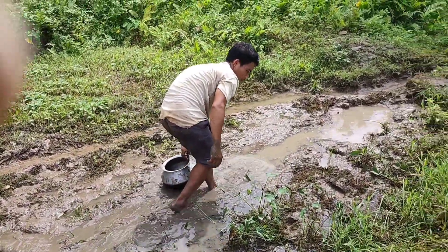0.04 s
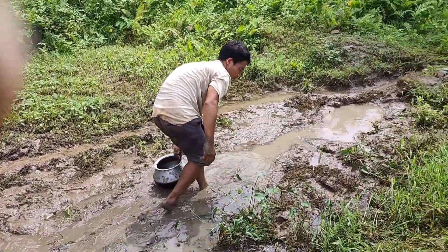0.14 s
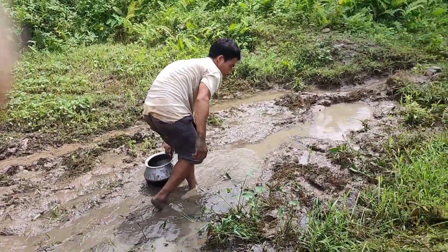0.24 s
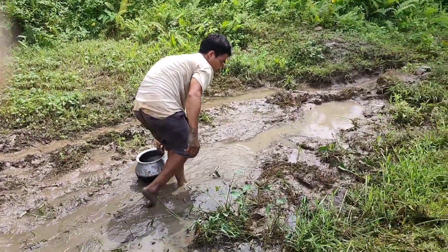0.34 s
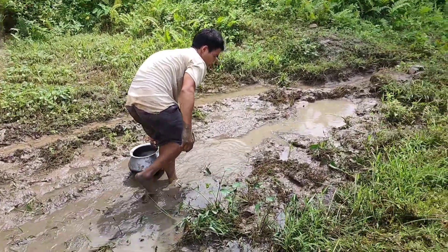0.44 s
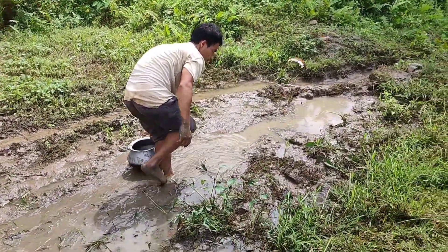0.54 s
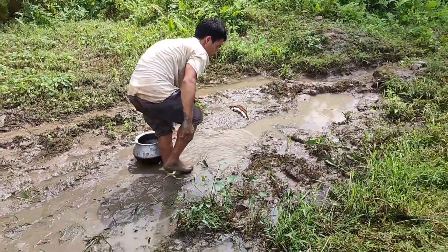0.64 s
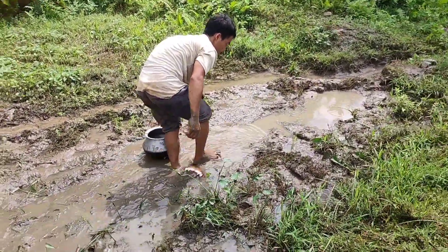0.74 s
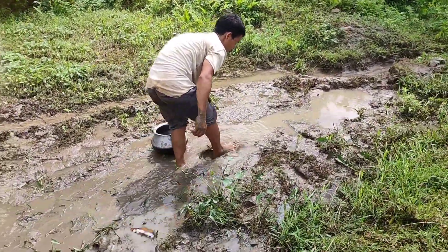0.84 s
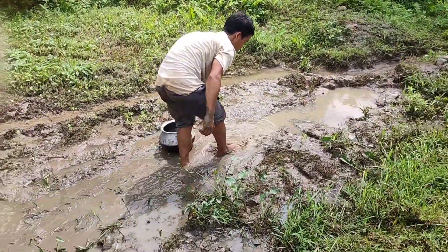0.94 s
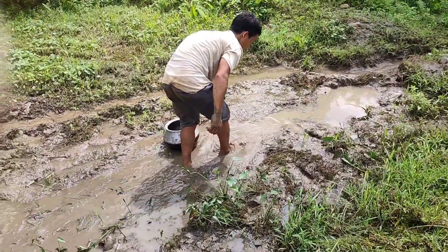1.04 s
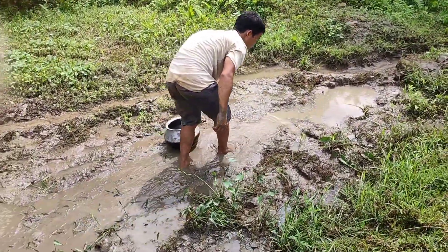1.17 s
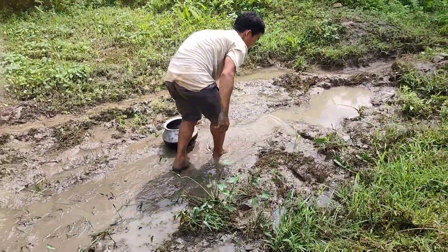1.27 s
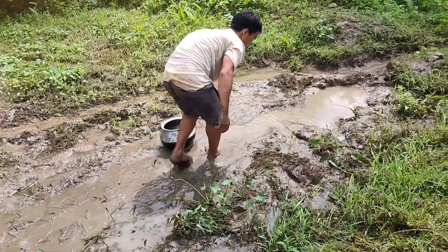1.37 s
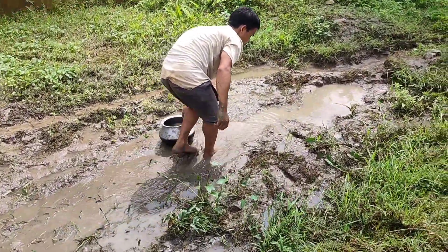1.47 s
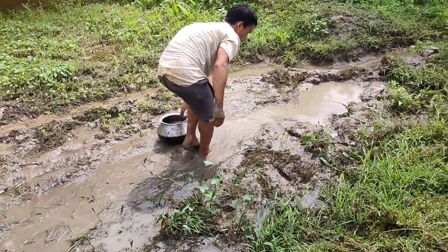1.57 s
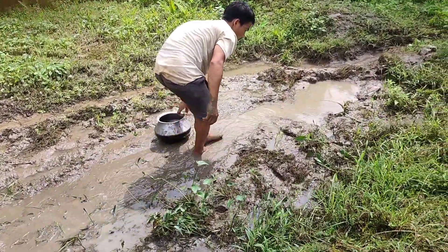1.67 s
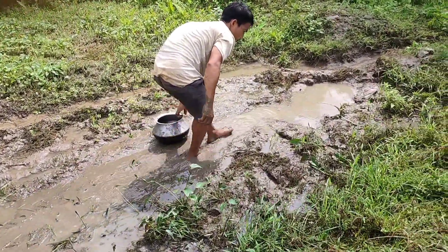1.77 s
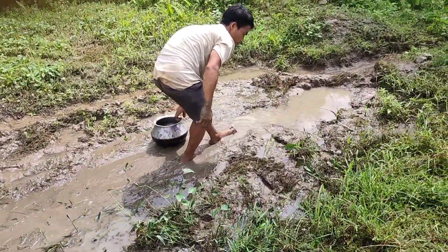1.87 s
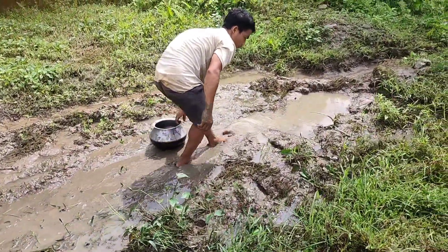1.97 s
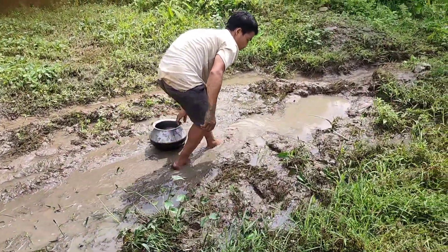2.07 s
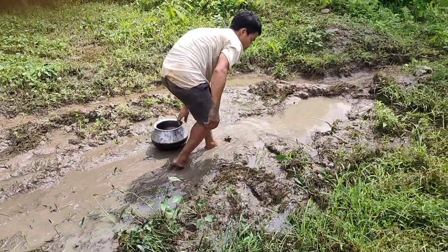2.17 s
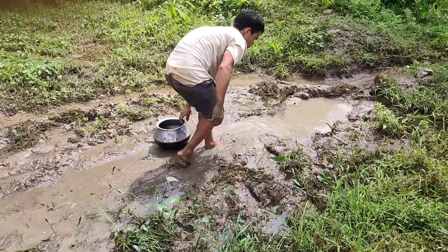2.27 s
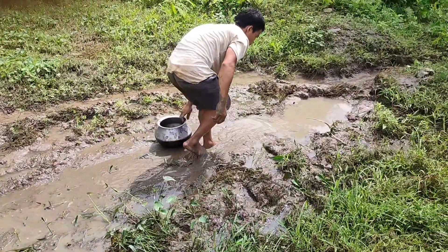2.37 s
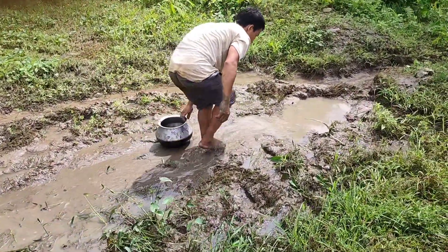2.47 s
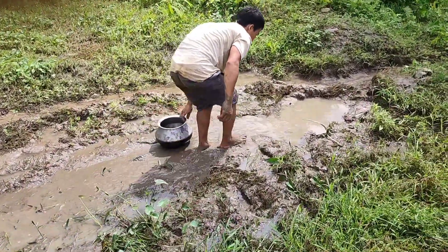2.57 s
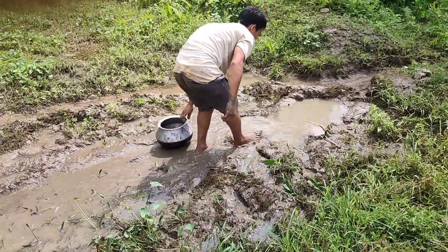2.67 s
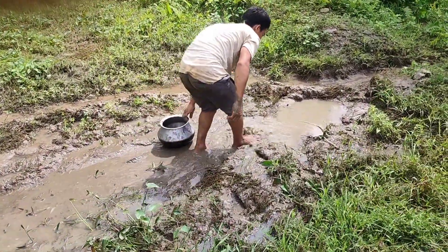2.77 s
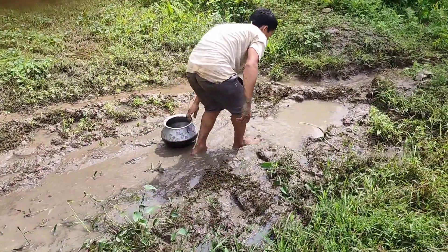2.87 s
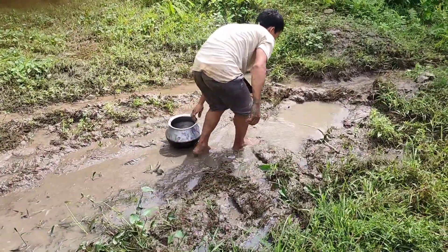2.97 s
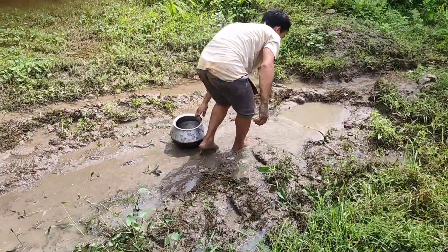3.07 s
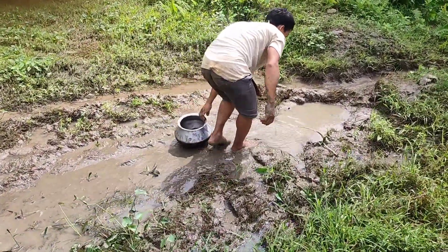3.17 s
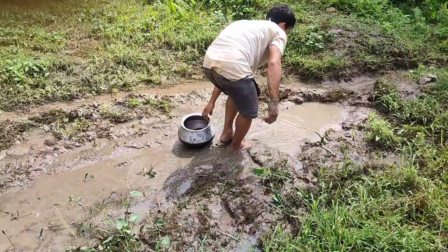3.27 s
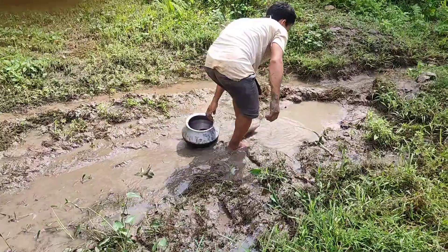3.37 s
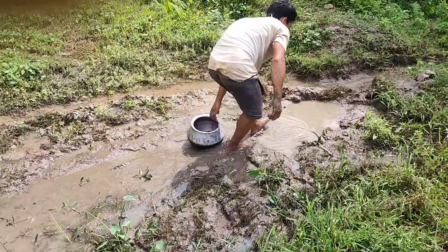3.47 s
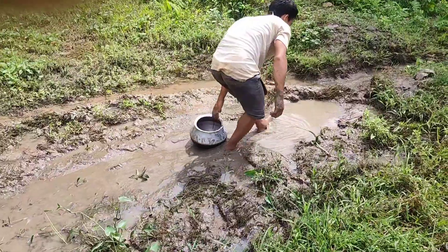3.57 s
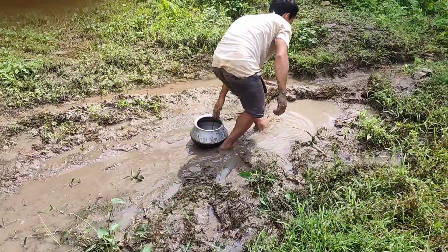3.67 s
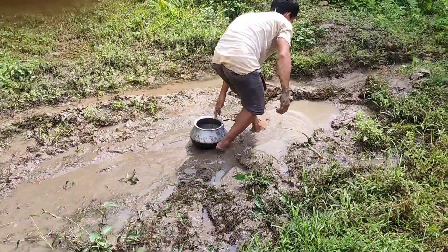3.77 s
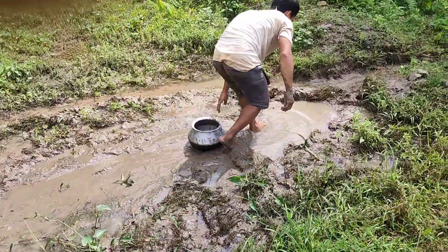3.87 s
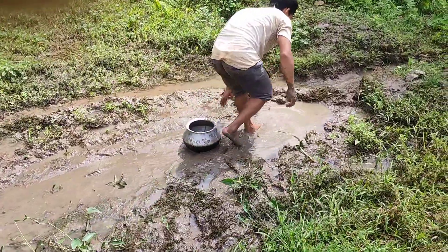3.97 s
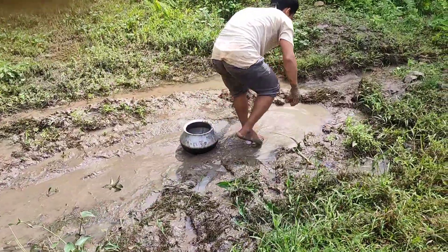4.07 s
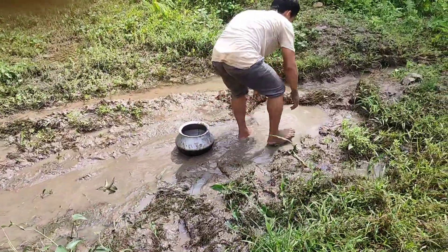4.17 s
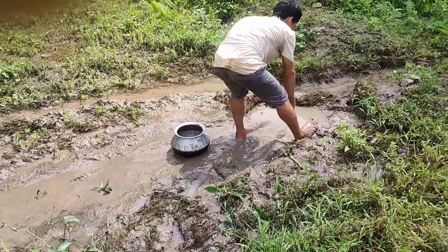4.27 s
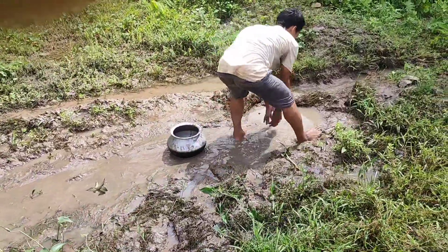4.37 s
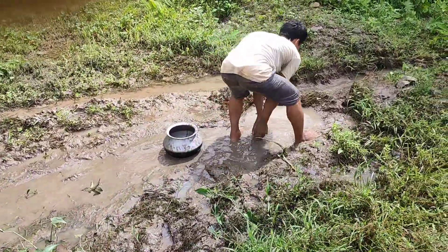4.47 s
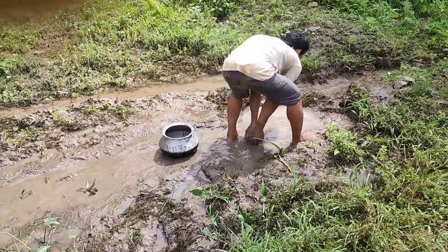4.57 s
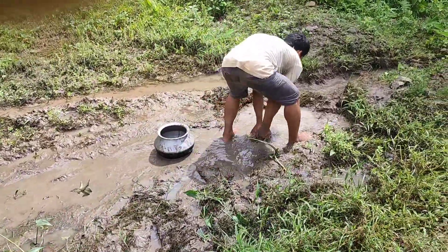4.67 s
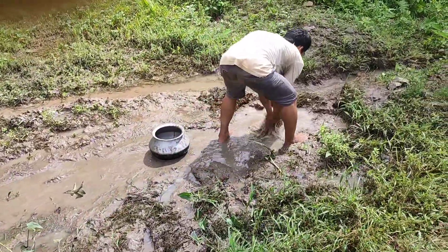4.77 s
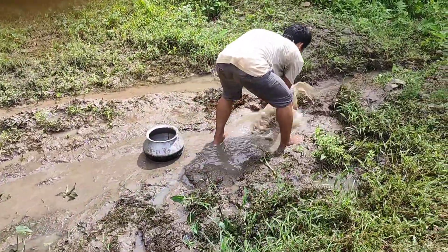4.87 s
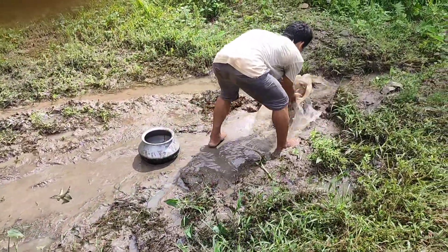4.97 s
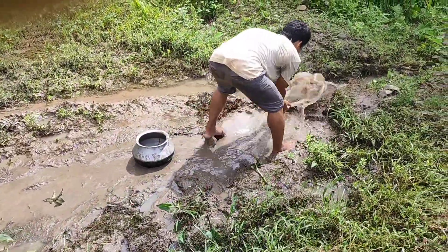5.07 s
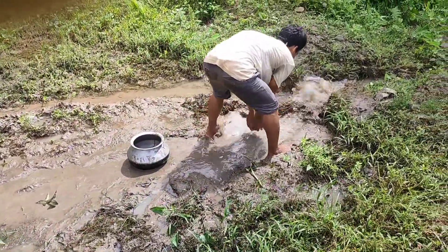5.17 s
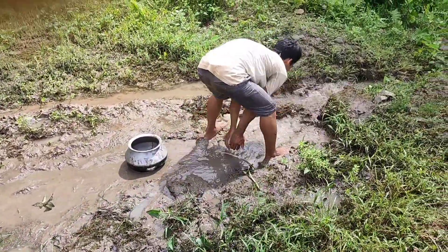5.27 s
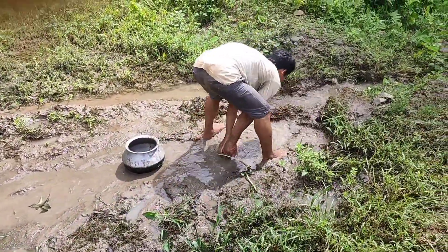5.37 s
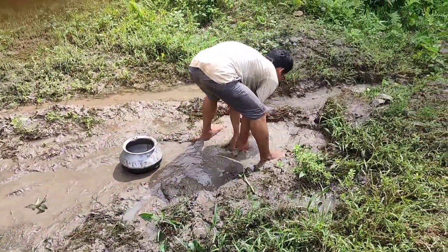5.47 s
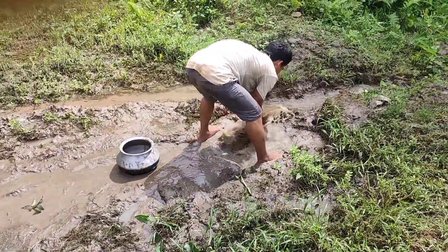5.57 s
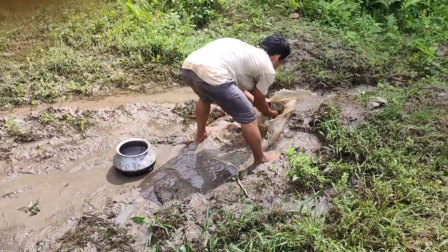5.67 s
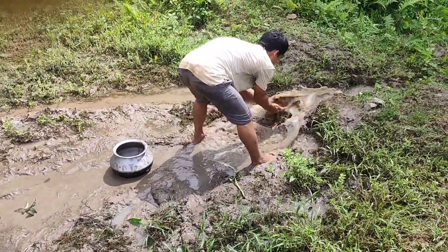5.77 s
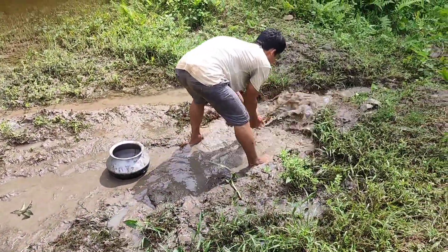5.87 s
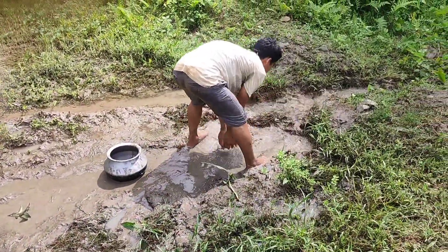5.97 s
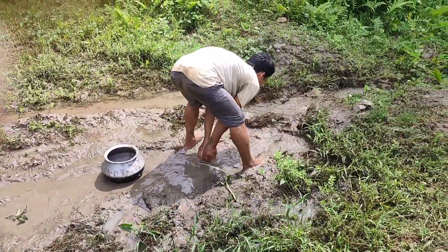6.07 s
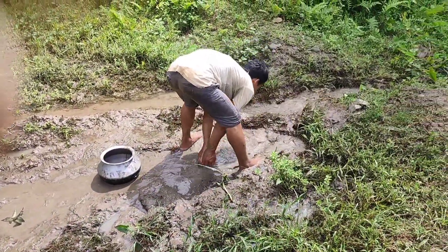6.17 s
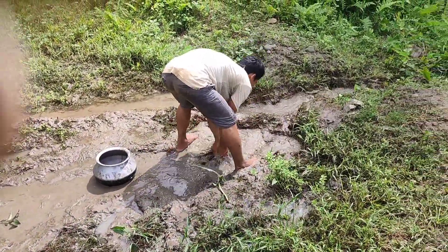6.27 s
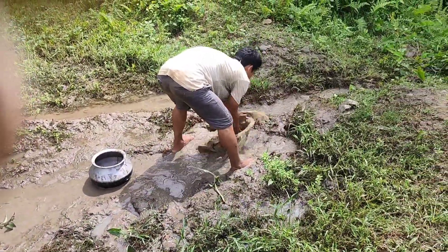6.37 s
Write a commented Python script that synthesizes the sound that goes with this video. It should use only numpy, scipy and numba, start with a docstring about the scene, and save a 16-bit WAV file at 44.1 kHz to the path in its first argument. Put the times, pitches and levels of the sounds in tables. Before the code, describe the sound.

Sparse muddy wading steps and gurgles, a handling bump and rub, then busier scooping with two bright splashes over a quiet open field.

```python
"""Open field, shallow mud puddle: bare feet wade, then cupped hands scoop the water and fling it out twice.
Each step, scoop and throw swells, holds and dies away; trapped air rings as short, gliding sines.
Thrown water lands as spray clicks, pings and mist over big, quickly damped air pockets.
A finger hisses over a hand-held phone near its left port and bumps it once.
The field is soft noise with a regular low throb and a thin high insect band."""
import sys
import numpy as np
from scipy import signal
from scipy.fft import rfft, irfft, next_fast_len
from scipy.io import wavfile
from scipy.ndimage import uniform_filter1d
from numba import njit

SR = 44100
rng = np.random.default_rng(int(sys.argv[2]) if len(sys.argv) > 2 else 0)


def dump(signal):
    """Clip the signal to [-1, 1] and save it as 16-bit WAV at the path in sys.argv[1]."""
    limited = np.clip(np.atleast_2d(signal).T, -1, 1)
    pcm = np.round(limited * 32767).astype(np.int16)
    wavfile.write(sys.argv[1], SR, pcm)


N = 283563
TIME = np.arange(N) / SR


def undb(db):
    """Decibels to gain."""
    return np.exp(np.asarray(db) * (np.log(10) / 20))


def unit(x):
    """Scale to rms 1."""
    return x / np.sqrt(np.mean(x ** 2))


def sides(pan_db):
    """Left and right gains for a level difference."""
    return undb(np.array([[.5], [-.5]]) * pan_db)


def track_gain(t_s, level_db):
    """Gain along a level track, silent outside it."""
    return undb(np.interp(TIME, t_s, level_db, left=-np.inf, right=-np.inf))


def across(points, hz):
    """Read (f/Hz, value) points on a log-frequency axis."""
    f, value = np.transpose(points)
    return np.interp(np.log(hz + 1), np.log(f), value)


def colour(x, points, size=4096):
    """Minimum-phase filter through (f/Hz, gain/dB) points; causal, so attacks stay sharp."""
    hz = np.arange(size // 2 + 1) * SR / size
    cepstrum = irfft(np.log(undb(across(points, hz))))
    cepstrum[1:size // 2] *= 2
    cepstrum[size // 2 + 1:] = 0
    impulse = irfft(np.exp(rfft(cepstrum)))
    return signal.oaconvolve(x, impulse[None], axes=1)[:, :N]


def walk(rate_hz):
    """Smooth random curve, about rate_hz turns a second, spread a little under 1."""
    k = int(SR / rate_hz)
    return uniform_filter1d(np.repeat(rng.standard_normal(N // k + 1), k), k)[:N]


def even(x, span_s):
    """Steady a swarm's power over span_s; single grains stay uneven."""
    k = max(int(span_s * SR), 1)
    power = uniform_filter1d(uniform_filter1d(np.mean(unit(x) ** 2, axis=0), k), k)
    return x / np.sqrt(np.mean(x ** 2) * (power + 0.0078))


# field noise spectrum: f/Hz, gain/dB
FIELD_COLOUR = [(25, -9.5), (100, 0), (260, -4.5), (380, -5), (900, -12.5), (1600, -14.5), (2200, -12.5),
                (3100, -20.5), (5500, -27), (7000, -34), (9000, -24.5), (13000, -35), (15800, -59)]
# likeness of that noise at the two ports: f/Hz, likeness (0-1)
FIELD_LIKENESS = [(30, 0), (120, 0.44), (400, 0.46), (2000, 0), (5000, 0), (15000, 0)]


def field():
    """Open air as part-shared noise, low noise in a regular throb, narrow high noise for insects."""
    mid, side = rng.standard_normal((2, 1, N))
    shared = [(hz, 10 * np.log10(1 + min(c, .98))) for hz, c in FIELD_LIKENESS]
    apart = [(hz, 10 * np.log10(1 - min(c, .98))) for hz, c in FIELD_LIKENESS]
    pair = colour(mid, shared) + colour(side, apart) * np.array([[1], [-1]])
    air = unit(colour(pair, FIELD_COLOUR))
    throb = np.cos(np.pi * (TIME - 1.16) / .632) ** 16  # one pulse every 0.632 s
    low = rng.standard_normal((1, N)) + 0.37 * rng.standard_normal((2, N))
    rumble = unit(colour(low, [(25, -17), (65, -3), (120, -4.5), (200, -17), (600, -50)])) * throb
    high = rng.standard_normal((2, N))
    insects = unit(colour(high, [(7000, -48), (8200, -17.0), (8700, -11.5), (9500, -28)]))
    return air * undb(-62.0) + rumble * undb(-63.0) + insects * undb(-75.5)


@njit
def ring(start, hz, size, fade, rise, swell):
    """Sum of fading sines; each swells over `swell` cycles and climbs by `rise` over six fade times."""
    out = np.zeros(N)
    for k in range(len(start)):
        first = max(int(start[k] * SR) + 1, 0)
        pole = 2j * np.pi * hz[k] * (1 - rise[k] / 6) - 1 / fade[k]
        z = size[k] * np.exp(pole * (first / SR - start[k]))
        step = np.exp(pole / SR)
        glide = np.exp(2j * np.pi * hz[k] * rise[k] / (6 * fade[k] * SR ** 2))
        pace = hz[k] / (swell * SR)
        for i in range(first, min(first + int(6 * fade[k] * SR), N)):
            age = (i - start[k] * SR) * pace
            out[i] += z.imag * (1 - np.exp(-age ** 2)) if age < 2.5 else z.imag
            z *= step
            step *= glide
    return out


PORT_LAG_S = .00005  # mean lag of left behind right


def bubbles(rows, rise, swell, scatter_s, scatter_db):
    """Air pockets ring, gliding in pitch by `rise`; each reaches the ports from its own place."""
    # rows: t/s, f/Hz, level/dB, t60/s
    s, hz, db, t60 = np.transpose(rows).copy()
    climb, place, lean = rng.standard_normal((len(s), 3)).T
    lag = PORT_LAG_S + scatter_s * place
    fade = np.maximum(t60, 1e-3) / np.log(1000)
    rises = rise * (1 + climb)
    return np.array([ring(s + side * lag, hz, undb(db + side * scatter_db * lean), fade, rises, float(swell))
                     for side in (.5, -.5)])


def slosh(level_db, spectrum, per_s, cycles, spread_db, rise, churn_db, span_s):
    """Swarm of small bubbles of all sizes, mud-damped, over the churn of the breaking surface."""
    time, bore, size, life = rng.random((int(per_s * N / SR), 4)).T
    hz = 450 * (3400 / 450) ** (bore ** .75)
    db = -spread_db * np.log(1 - .97 * size) + 12 * np.log10(hz / 1000)
    rows = np.transpose([time * N / SR, hz, db, cycles * (.5 + life) / hz])
    swarm = unit(bubbles(rows, rise=rise, swell=1.53, scatter_s=.00006, scatter_db=3.5))
    # only a brisk move traps air; a gentle one just swishes
    trapped = 1 / (1 + undb(-72.0 - level_db) ** 3)
    # long waves reach both ports alike, short ones differ
    alike = rng.standard_normal((1, N))
    churn = alike + colour(rng.standard_normal((2, N)), [(500, -14), (1400, 6)])
    mix = colour(trapped * swarm + undb(churn_db) * churn, spectrum)
    return even(mix, span_s) * undb(level_db)


def flurries(x, shared_db, own_db):
    """Drops land in clusters; each drop size, a 2 kHz-spaced band, has clusters of its own."""
    size = next_fast_len(N, real=True)
    hz = np.arange(size // 2 + 1) * SR / size
    spectrum, out = rfft(x.astype(np.float32), size), 0
    for centre_hz in np.arange(2000, 17000, 2000):
        band = np.maximum(1 - np.abs(hz - centre_hz) / 2000, 0).astype(np.float32)
        out = out + irfft(spectrum * band, size)[:, :N] * undb(own_db * walk(70))
    return unit(out * undb(shared_db * (walk(45) + walk(170))))


# spray spectrum: f/Hz, gain/dB
SPRAY_COLOUR = [(1760, -22.5), (3000, -5), (4190, -12.5), (4680, -13), (5260, -14.5), (6660, -16.5),
                (7980, -12), (10100, -14.5), (12400, -9.5), (14100, -16), (15800, -26)]


def spray(per_s, spread_db, mist_db, flicker_db):
    """Droplet clicks over a fine mist, unlike at the two ports; pinheads of trapped air ping."""
    time, size, left, right = rng.random((int(per_s * N / SR), 4)).T
    gain = undb(-spread_db * np.log(1 - .99 * size))
    clicks = [np.bincount((time * N).astype(int), (weight - .5) * gain, N) for weight in (left, right)]
    time, bore, size = rng.random((int(1100 * N / SR), 3)).T
    hz = 3000 * (14000 / 3000) ** bore
    rows = np.transpose([time * N / SR, hz, 12 * size + 10 * np.log10(hz / 3000), 70 / hz])
    pings = bubbles(rows, rise=0.008, swell=1.8, scatter_s=.0001, scatter_db=6.5)
    mist = undb(mist_db) * rng.standard_normal((2, N))
    drops = unit(np.array(clicks)) + undb(-0.5) * unit(pings) + mist
    return flurries(even(colour(drops, SPRAY_COLOUR), span_s=0.068), flicker_db, own_db=4.0)


def move(t, start_s, length_s, attack_s, release_db_per_s):
    """Gain of one move: swells up to its start, holds for its length, dies away."""
    swell = np.clip(1 + (t - start_s) / max(attack_s, 1e-3), 0, 1)
    return swell * undb(-release_db_per_s * np.maximum(t - start_s - length_s, 0))


# trickle of stirred water: level under its move, fade
SETTLE_DB, SETTLE_DB_PER_S = -15.5, 40


def efforts(table, slosh_shape, spray_shape):
    """Slosh and spray levels in dB stirred up by a series of moves; a faint trickle follows each."""
    t = TIME[::32]
    power = np.full((2, len(t)), 1e-14)
    for s, length_s, slosh_db, spray_db, *_ in table:
        layers = [(slosh_db, slosh_shape), (spray_db, spray_shape)]
        for layer, (db, (attack_s, release)) in enumerate(layers):
            trickle = undb(SETTLE_DB) * move(t, s, length_s, attack_s, SETTLE_DB_PER_S)
            gain = np.maximum(move(t, s, length_s, attack_s, release), trickle)
            power[layer] += (undb(db) * gain) ** 2
    return np.array([np.interp(TIME, t, level) for level in 10 * np.log10(power)])


# a foot sinks in or pulls out: t/s, length/s, slosh level/dB, spray level/dB
STEPS = [(0.0, 0.021, -59, -63.5), (0.78, 0.027, -49.5, -52), (0.935, 0.018, -54.5, -66),
         (1.015, 0.017, -63, -60), (1.17, 0.061, -84, -67.5), (1.48, 0.12, -54, -60.5),
         (1.69, 0.11, -56, -66.5), (1.96, 0.05, -58, -65.5), (2.3, 0.2, -67, -97), (2.545, 0.098, -54, -58),
         (2.715, .13, -61, -66), (3.14, 0.16, -59.5, -61), (3.335, 0.0081, -53.5, -63),
         (3.415, 0.041, -51.5, -70), (3.675, 0.0067, -55, -63.5), (3.75, 0.13, -62.5, -67.5),
         (4.297, 0.024, -61.5, -58), (4.365, 0.06, -60, -60.5), (4.48, 0.071, -64, -74)]
# wading slosh spectrum: f/Hz, gain/dB
WADE_COLOUR = [(300, -31), (600, -16.5), (950, -10), (1250, -5), (1800, -3), (2250, 5), (2800, -9),
               (3300, -14), (4500, -11), (7000, -55)]
# attack/s, release/(dB/s)
STEP_SLOSH, STEP_SPRAY = (0.034, 276), (0.036, 310)


def wading():
    """Feet push through the mud: sparse bubbles and a light crackle."""
    slosh_db, spray_db = efforts(STEPS, STEP_SLOSH, STEP_SPRAY)
    water = slosh(slosh_db, WADE_COLOUR, per_s=450, cycles=81, spread_db=7.5, rise=0.014,
                  churn_db=-12, span_s=0.035)
    return water + spray(per_s=1500, spread_db=1.5, mist_db=3.5, flicker_db=3.0) * undb(spray_db)


# skin sliding on the phone's case, one table a stroke: t/s, level/dB
RUBS = [
    [(.12, -84), (.2, -70.5), (.37, -71.5), (.55, -79)],
    [(.55, -77.5), (.76, -61.5), (.80, -54.5), (.92, -57.5), (1.0, -60), (1.14, -82)],
    [(2.02, -80), (2.11, -56.5), (2.16, -46.5), (2.2, -46.5), (2.215, -54.5), (2.31, -82)],
]
# finger hits the case: t/s, f/Hz, level/dB, t60/s
BUMP = [(.4755, 294, -29.5, 0.039)]
# rub spectrum: f/Hz, gain/dB
RUB_COLOUR = [(880, -23), (1500, -5), (2530, -2), (3500, -4), (3820, -0.5), (5500, -10.5), (7990, 0.5),
              (11000, -2), (13300, -0.5), (15800, -16)]


def finger():
    """Skin hisses over the case as shaped noise and bumps it once as a damped ring, close to the left port."""
    stroke = sum(track_gain(*np.transpose(rub)) for rub in RUBS)
    hiss = unit(colour(rng.standard_normal((2, N)), RUB_COLOUR)) * undb(1.8 * walk(150))
    bump = bubbles(BUMP, rise=-0.13, swell=0.28, scatter_s=0, scatter_db=-2.0)
    return hiss * stroke * sides(10.7) + bump * undb([[0], [-26]])


# bursting mud films and slapping drops: t/s, relative level/dB, left minus right/dB
SNAPS = [(0.558, -54, 4), (0.7763, -34, 0), (1.0157, -43.5, 7), (1.055, -56, 0), (1.166, -37, 6.5),
         (1.3344, -60, 18), (1.729, -50, 6), (2.7032, -40.5, 0), (2.932, -50, 1), (3.338, -47, -2),
         (4.299, -45, -6), (4.9308, -35, 6), (5.1297, -45, -12), (5.4792, -36.5, 3), (5.6432, -35, -1)]


def snaps(swell_s, fade_s, tail_s, tail_db):
    """Wet films burst: a noise crack of a millisecond and a short sizzle."""
    out, t = np.zeros((2, N)), TIME[:SR // 20]
    decay = np.exp(-t / fade_s) + undb(tail_db) * np.exp(-t / tail_s)
    shape = (1 - np.exp(-(t / swell_s) ** 2)) * decay
    for s, db, pan_db in SNAPS:
        i = int(s * SR)
        crack = shape * rng.standard_normal((2, len(t)))
        out[:, i:i + len(t)] += undb(db + 10) * sides(pan_db) * crack
    return colour(out, [(500, -15), (2000, 1.0), (4000, -2.5), (8000, -1.5), (15000, -2.5)])


# loudest single air pockets: t/s, relative level/dB, f/Hz
BUBBLES = [(0.7766, -33.5, 2430), (0.7814, -38, 2340), (0.8084, -39, 2160), (0.818, -38, 2400),
           (0.9328, -39.5, 2090), (0.9424, -42, 2100), (1.0181, -41, 2510), (1.4087, -51, 2480),
           (1.4825, -41, 1990), (1.5314, -46, 2240), (1.5658, -46, 2090), (1.5804, -45, 2370),
           (1.6242, -43, 2415), (1.728, -29, 3240), (1.8462, -44, 2070), (1.9664, -24.5, 1880),
           (1.9774, -39, 1880), (2.0038, -46, 2000), (2.2443, -46.5, 2055), (2.5301, -43, 2040),
           (2.5531, -46.5, 1810), (2.585, -37, 2900), (2.6065, -31.5, 1780), (2.6184, -35, 1870),
           (2.6334, -38.5, 1770), (2.6539, -34, 2590), (2.7656, -31.5, 1910), (2.8075, -46, 1690),
           (2.8729, -48.5, 1830), (3.2415, -35, 2330), (3.3378, -32, 2300), (3.4121, -29.5, 2240),
           (3.4306, -29.5, 2175), (3.7484, -45, 2050), (3.8477, -46, 2320), (4.0577, -46.5, 2070),
           (4.2996, -41, 2170), (4.3104, -44, 2160), (4.7102, -37, 2090), (4.7536, -23.5, 2030),
           (4.7701, -23, 2000), (4.8294, -27, 1950), (5.1297, -31, 1870), (5.2854, -22, 1960),
           (5.3178, -20, 1930), (5.5054, -26, 2180), (5.5373, -27, 2050), (5.6436, -21.5, 2060),
           (5.6514, -22.5, 2150), (5.8007, -29, 2000), (5.8134, -25, 2000), (5.9329, -27, 2150),
           (5.9454, -29, 2040), (6.0152, -22, 2050), (6.2502, -28.5, 1670), (6.3405, -32, 2500),
           (6.3894, -23, 2230), (1.565, -44, 897), (1.673, -47.5, 1015), (2.295, -52.5, 1100),
           (2.349, -42.5, 986), (2.378, -46.5, 1233), (3.16, -29.5, 984), (3.224, -43.5, 840),
           (3.338, -29.5, 1150), (3.432, -45.5, 1000), (3.557, -49, 1416), (3.739, -55, 1190),
           (3.832, -42.5, 925), (3.991, -35.5, 1140), (4.782, -27, 1190), (5.081, -27.5, 1020),
           (5.491, -29, 1340), (6.035, -18, 1230), (6.044, -19.5, 870), (6.079, -27.5, 1420),
           (6.175, -30, 855), (6.304, -25.5, 1520), (6.405, -21, 1430), (3.152, -36, 726),
           (3.175, -27.5, 577), (3.191, -33.5, 530), (3.734, -53, 703), (5.224, -25.5, 765),
           (5.835, -30.5, 810)]
# large cavities closing: t/s, f/Hz, relative level/dB, t60/s
GULPS = [(3.3462, 523, -39.5, 0.047), (6.0445, 261, -18, 0.025), (6.148, 466, -41.5, 0.058),
         (6.374, 508, -39.5, 0.04)]
# t60 of a 1 kHz pocket at the plain level; smaller, higher ones die sooner by this power of pitch
POCKET_T60_S, POCKET_SIZE_LAW = 0.03, 0.57
# harder bursts ring more briefly: plain table level, rise that halves t60
POCKET_PLAIN_DB, POCKET_HALVING_DB = -35.5, 18.5


def plops():
    """Air pockets that stand out, small and large: damped rings that climb in pitch."""
    s, db, hz = np.transpose(BUBBLES)
    hardness = 2 ** ((POCKET_PLAIN_DB - db) / POCKET_HALVING_DB)
    t60 = POCKET_T60_S * (1000 / hz) ** POCKET_SIZE_LAW * hardness
    small = bubbles(np.transpose([s, hz, db, t60]), rise=0.097, swell=1.77, scatter_s=.00003, scatter_db=1.0)
    large = bubbles(GULPS, rise=0.19, swell=0.61, scatter_s=.00005, scatter_db=-0.5)
    return undb(5) * small + colour(large, [(50, -26), (110, -18.0), (190, 4), (900, 1.5)])


# wet gurgles beside a foot or hand, one table each: t/s, resonance f/Hz, level/dB
# two slide down, the last is a wash near 2.4 kHz
SQUELCHES = [
    [(1.60, 2500, -71), (1.635, 2320, -58), (1.70, 2000, -51.5), (1.79, 1960, -64), (1.87, 1960, -61.5)],
    [(4.33, 2280, -62), (4.357, 2040, -51), (4.385, 1830, -55), (4.425, 1620, -52), (4.465, 1350, -62)],
    [(6.25, 2400, -49.5), (6.30, 2324, -42.5), (6.38, 2380, -39.5), (6.43, 2340, -58)],
]


def squelch(track, per_s, detune):
    """A wet gurgle: a swarm of small pops, each ringing near the resonance that the track gives."""
    s, hz, db = np.transpose(track)
    when, offset, size = rng.random((int(per_s * (s[-1] - s[0])), 3)).T
    time = s[0] + when * (s[-1] - s[0])
    pitch = np.interp(time, s, hz) * (1 + detune * (offset - .5))
    rows = np.transpose([time, pitch, 12 * size, np.full_like(time, .022)])
    pops = bubbles(rows, rise=-0.044, swell=3.0, scatter_s=.00004, scatter_db=10)
    return even(pops, span_s=0.028) * track_gain(s, db)


# hands dig through the water; at 5.375 s thrown water drips back:
# t/s, length/s, slosh level/dB, spray level/dB
SCOOPS = [(4.708, 0.065, -46, -65.5), (4.77, 0.076, -41.5, -55.5), (4.89, 0.093, -46.5, -54.5),
          (5.075, 0.024, -43.5, -50.5), (5.375, 0.047, -44.5, -57.5), (5.503, 0.047, -39.5, -55),
          (5.643, 0.0067, -38, -48.5), (5.7, 0.015, -42.5, -64), (5.795, 0.043, -39, -51),
          (6.14, 0.052, -42, -56.5), (6.28, 0.16, -41.5, -56.5)]
# flung handful comes down: t/s, length/s, slosh level/dB, spray level/dB, plunge level/dB, pocket f/Hz
THROWS = [(5.215, .085, -34, -41, -45, 326), (5.961, .09, -34.5, -42.5, -45, 293)]
# bailing slosh spectrum: f/Hz, gain/dB
BAIL_COLOUR = [(300, -8.5), (480, -26.5), (620, -16.5), (760, -5), (900, -2), (1100, -8), (1320, 2),
               (1620, -7), (2080, 5), (2430, -3.5), (2700, -7.5), (3080, -9.5), (3500, -20), (4500, -18.5),
               (7000, -77)]
# attack/s, release/(dB/s); stray drops land well ahead of the bulk
SCOOP_SLOSH, SCOOP_SPRAY = (0.013, 122), (0.024, 79)
THROW_SLOSH, THROW_SPRAY = (0.061, 150), (0.14, 280)


def bailing():
    """Hands scoop and fling the water, which falls back: dense bubbles and a shower of drops."""
    scoops = efforts(SCOOPS, SCOOP_SLOSH, SCOOP_SPRAY)
    throws = efforts(THROWS, THROW_SLOSH, THROW_SPRAY)
    slosh_db, spray_db = np.maximum(scoops, throws)
    water = slosh(slosh_db, BAIL_COLOUR, per_s=950, cycles=51, spread_db=4.0, rise=0.036,
                  churn_db=-9, span_s=0.019)
    return water + spray(per_s=3200, spread_db=-0.5, mist_db=5.0, flicker_db=1.17) * undb(spray_db)


THROW_PLUNGE = (.02, 1100)  # attack/s, release/(dB/s): abrupt
PLUNGE_SAG_OCT_PER_S = 0.85  # pockets grow as the water drives deeper


def plunge(per_s, size_range, spread_db, cycles):
    """Each flung handful drives big, quickly damped pockets of air into the mud."""
    out = 0
    for s, length_s, _, _, db, pitch_hz in THROWS:
        when, bore, size = rng.random((int(per_s * 3 * length_s), 3)).T
        age = (3 * when - 1) * length_s  # from one length before the start to two after
        hz = pitch_hz * 2 ** (-PLUNGE_SAG_OCT_PER_S * age) * size_range ** (bore - .5)
        rows = np.transpose([s + age, hz, spread_db * size, cycles / hz])
        pockets = bubbles(rows, rise=0.038, swell=0.82, scatter_s=.00006, scatter_db=0.5)
        out = out + even(pockets, span_s=0.039) * undb(db) * move(TIME, s, length_s, *THROW_PLUNGE)
    return out


def banks(x, t60_s, wet_db):
    """Water, banks and legs scatter a brief noise tail, different at each port."""
    t = TIME[:SR // 4]
    tail = rng.standard_normal((2, len(t))) * undb(-60 * t / t60_s) * (t > .002)
    tail *= undb(wet_db) / np.sqrt(np.sum(tail ** 2, axis=1, keepdims=True))
    wet = signal.fftconvolve(x, tail, axes=1)[:, :N]
    return x + colour(wet, [(300, -1.5), (900, 3.0), (2000, 3), (10000, -3.5)])


# water at the left port over the right: f/Hz, difference/dB
PORT_TILT = [(300, -0.5), (1300, 0.5), (2300, -2.5), (3200, -4), (4400, 5), (6000, -6), (7600, 10),
             (9500, -3.5), (11500, -1), (14000, 3.5)]


def ports(x):
    """The phone's body shades each port in its own way: half the tilt added left, half taken off right."""
    return np.vstack([colour(x[[k]], [(hz, side * db) for hz, db in PORT_TILT])
                      for k, side in enumerate((.5, -.5))])


def scene():
    """The puddle in its field, and the hand on the phone."""
    mud = sum(squelch(track, per_s=370, detune=0.11) for track in SQUELCHES)
    cracks = snaps(swell_s=0.001, fade_s=0.0011, tail_s=0.0027, tail_db=-9.5)
    moves = wading() + bailing()
    splash = plunge(per_s=330, size_range=1.55, spread_db=9, cycles=26)
    water = moves + splash + plops() + mud + cracks
    return ports(banks(water, t60_s=0.075, wet_db=-8.5)) + finger() + field()


TOP_HZ = 15800


def record(dry):
    """The phone cuts the top: steep elliptic low-pass at TOP_HZ."""
    return signal.sosfilt(signal.ellip(10, .2, 70, TOP_HZ, fs=SR, output="sos"), dry)


dry = scene()
out = record(dry)
dump(out)
```